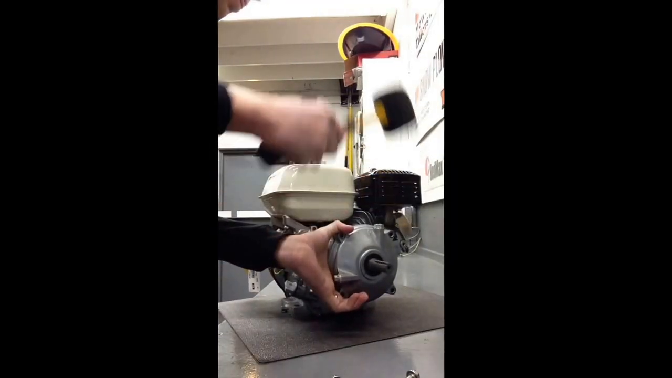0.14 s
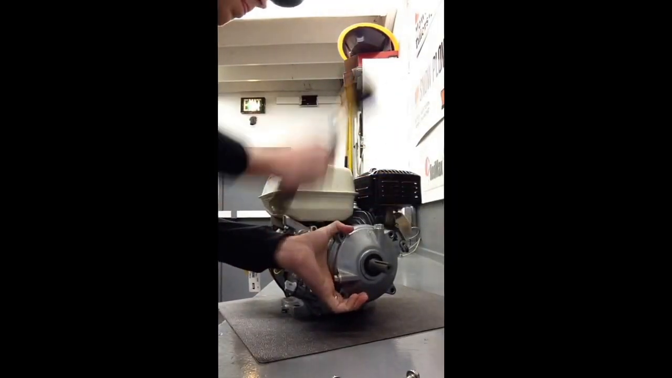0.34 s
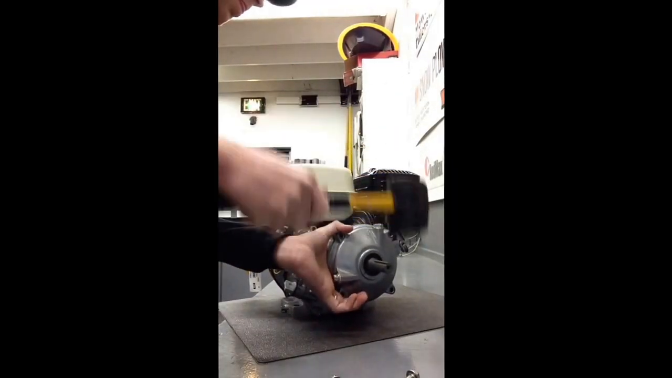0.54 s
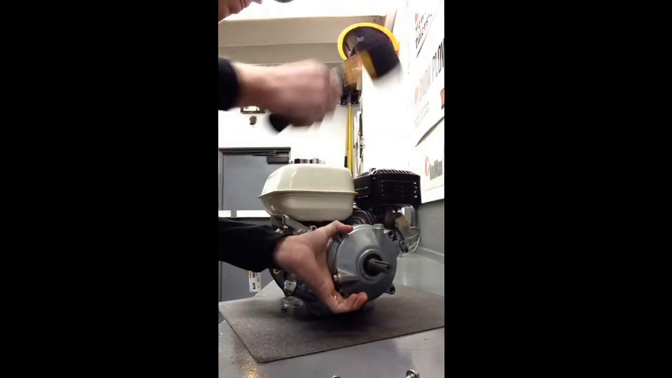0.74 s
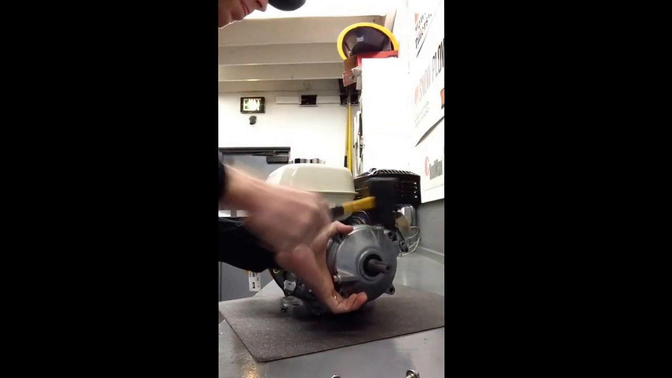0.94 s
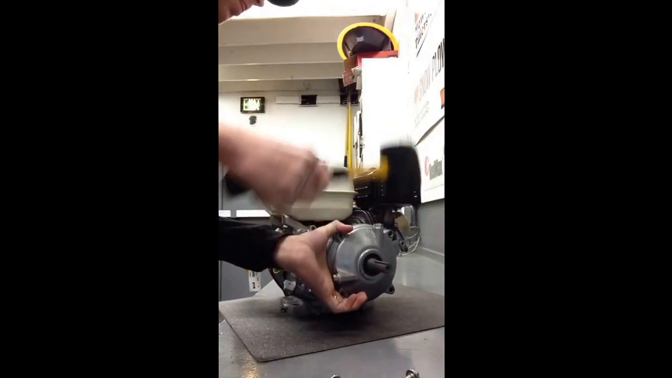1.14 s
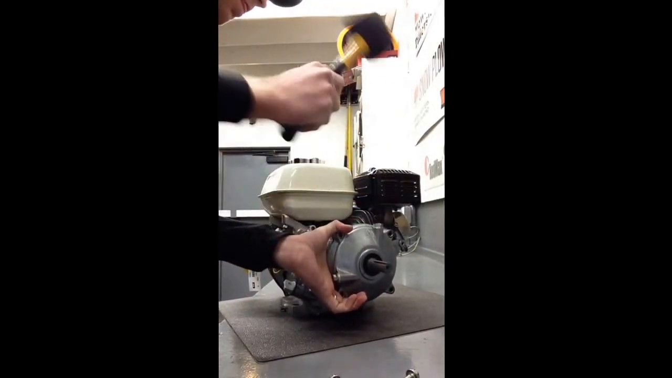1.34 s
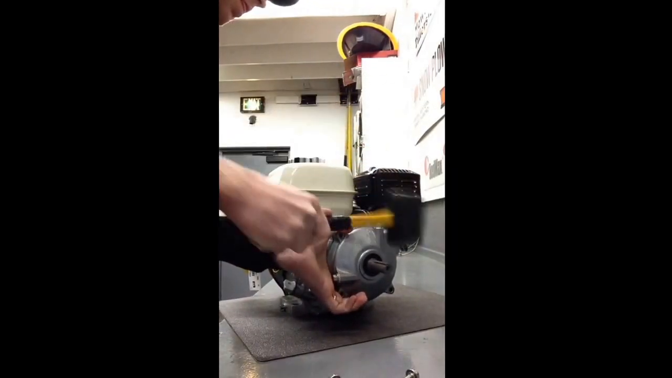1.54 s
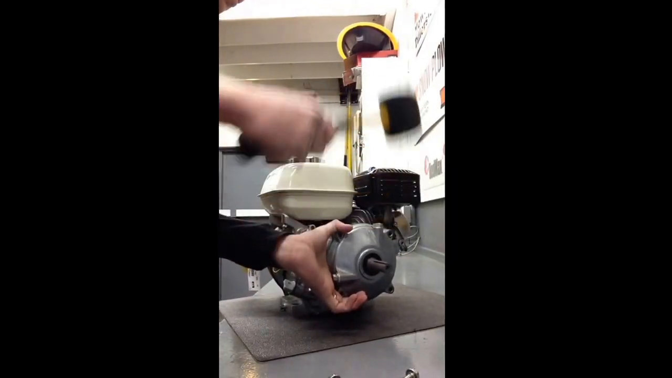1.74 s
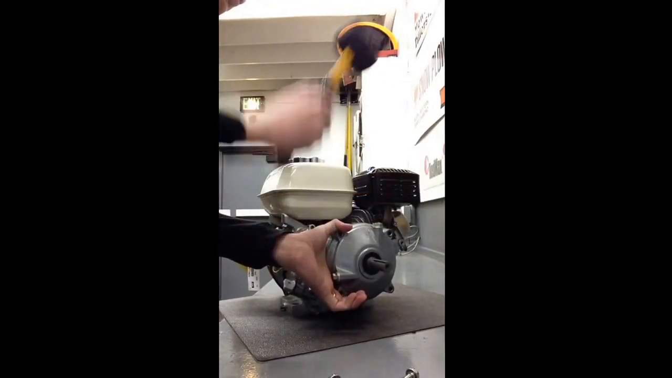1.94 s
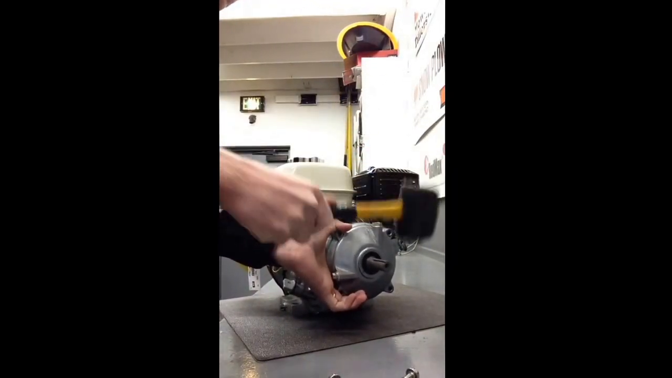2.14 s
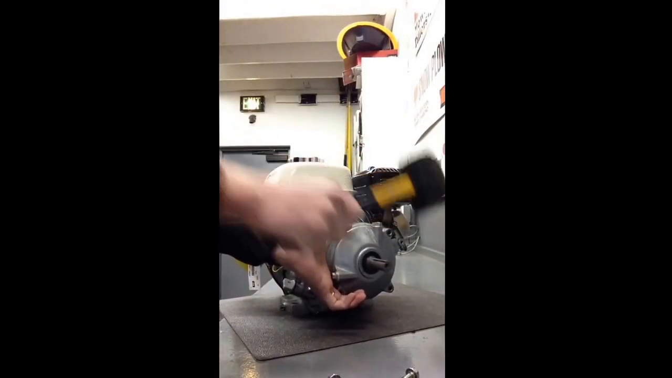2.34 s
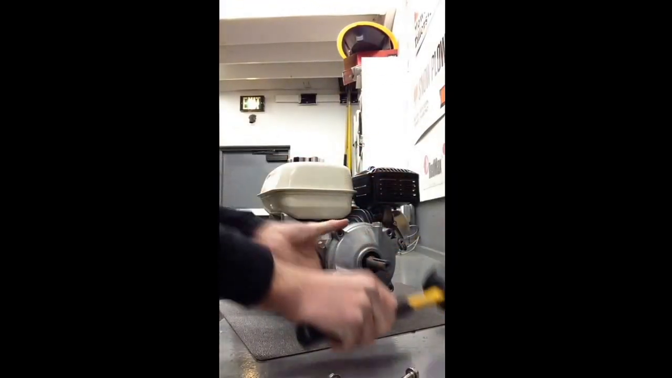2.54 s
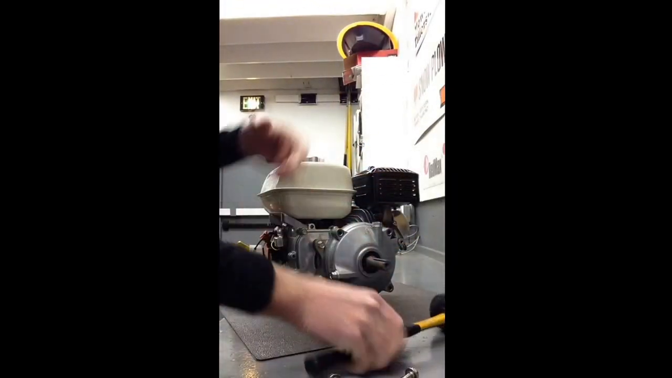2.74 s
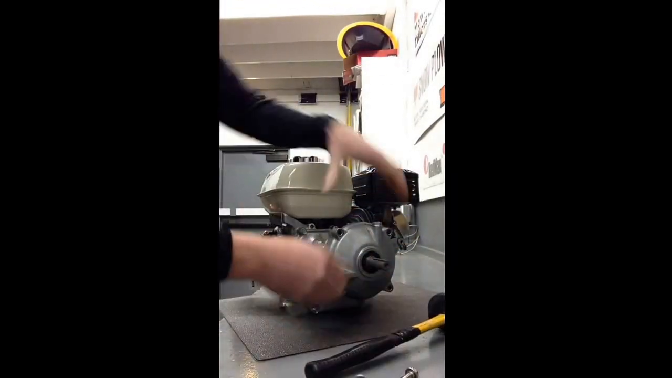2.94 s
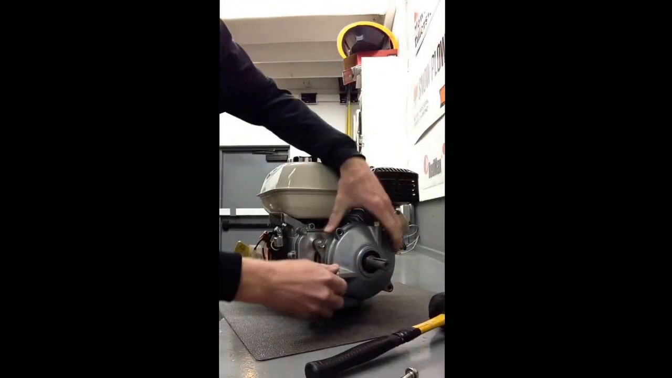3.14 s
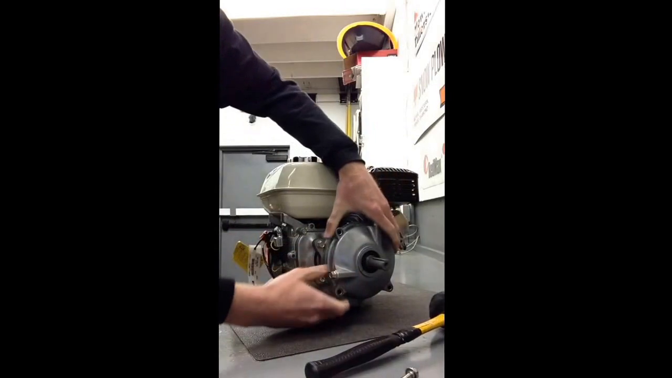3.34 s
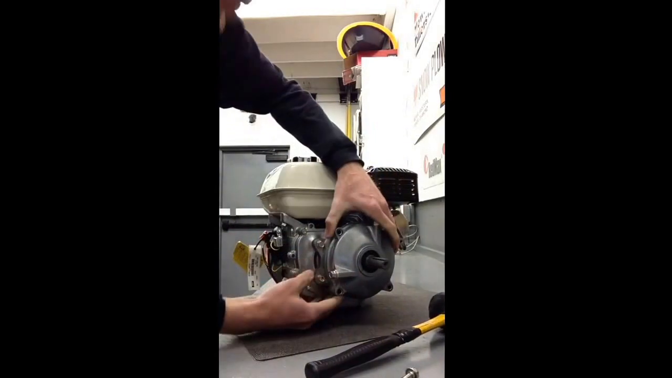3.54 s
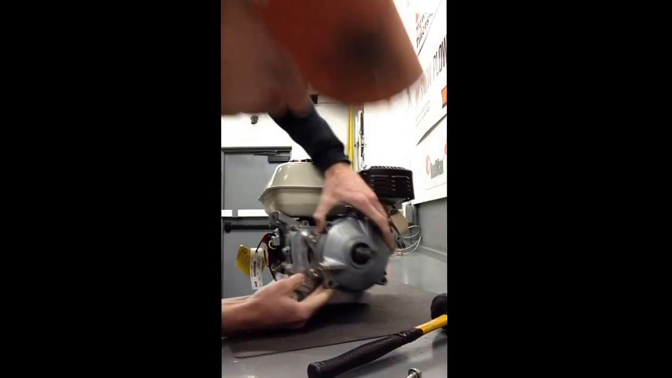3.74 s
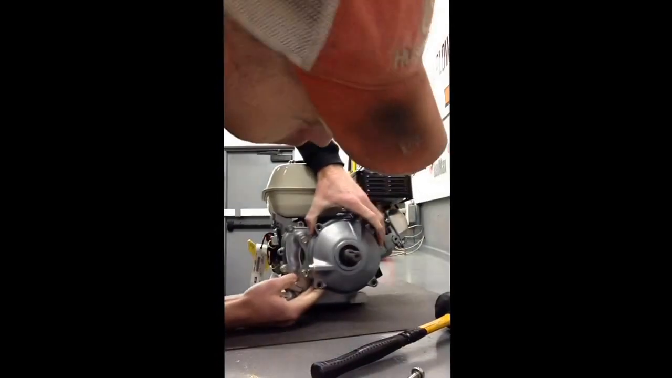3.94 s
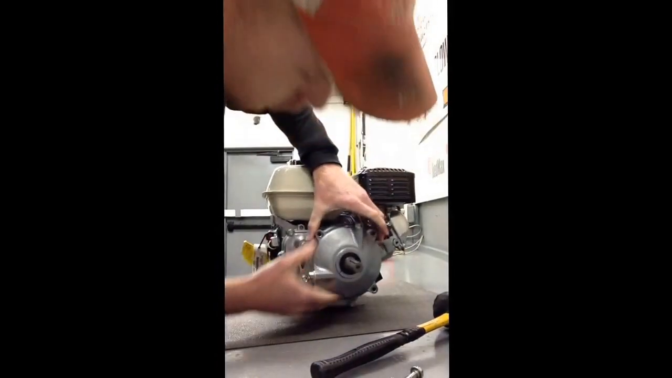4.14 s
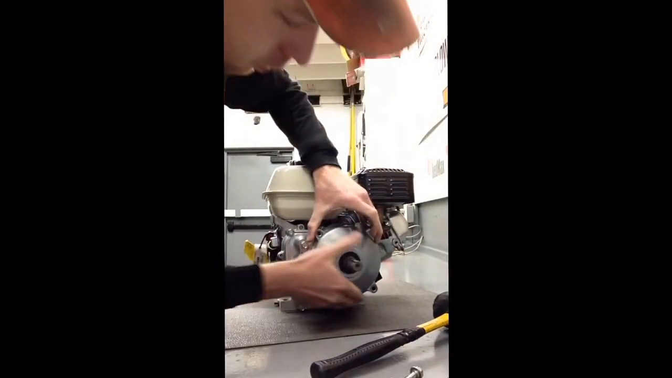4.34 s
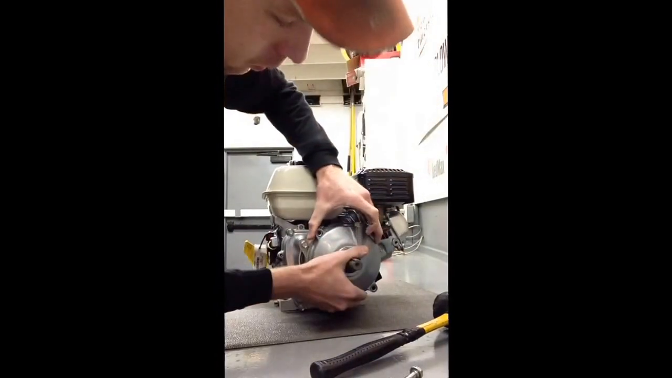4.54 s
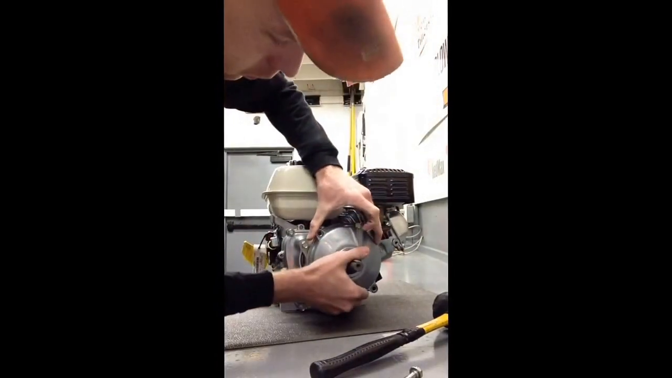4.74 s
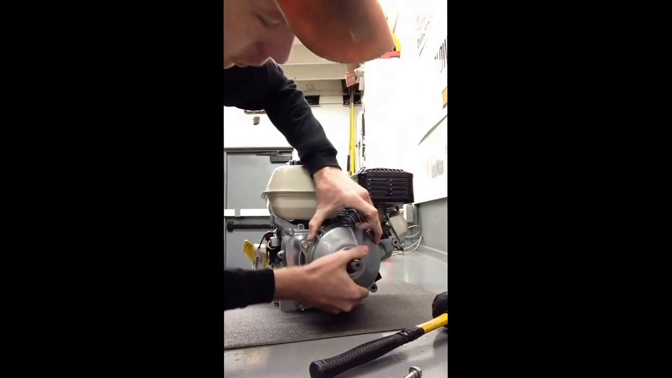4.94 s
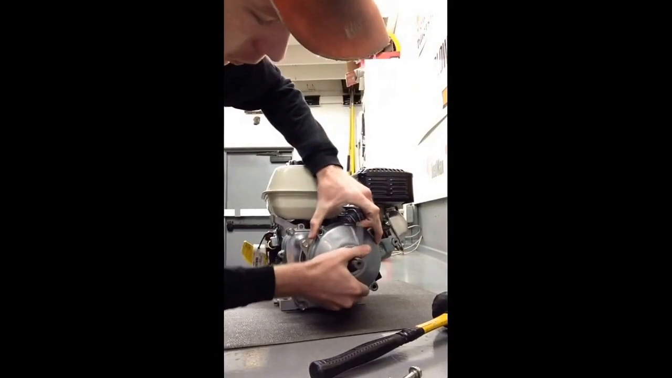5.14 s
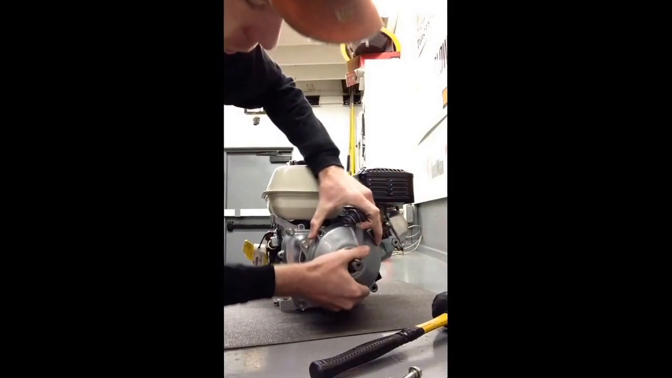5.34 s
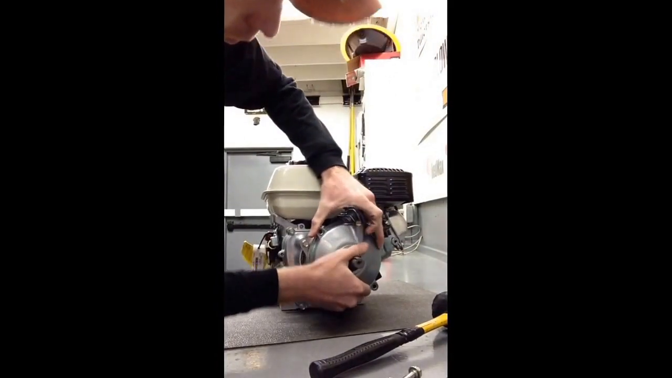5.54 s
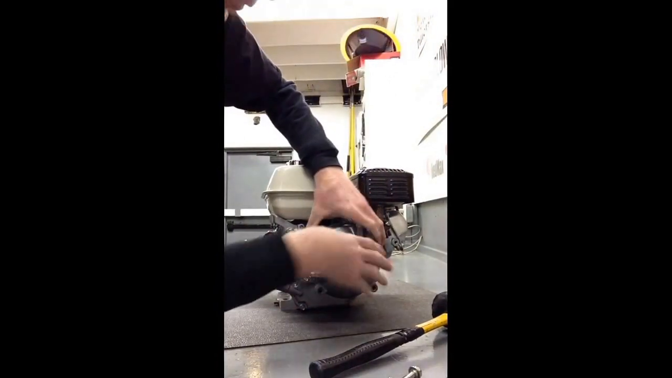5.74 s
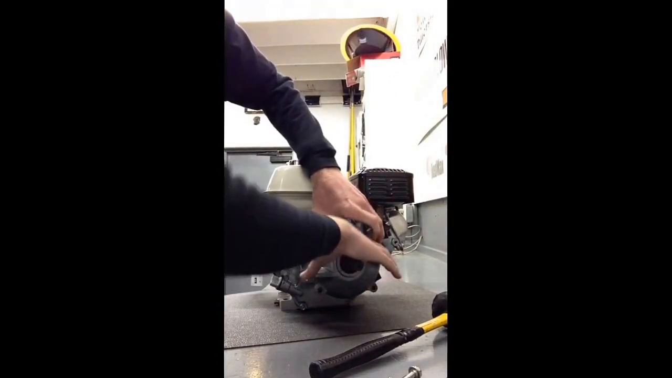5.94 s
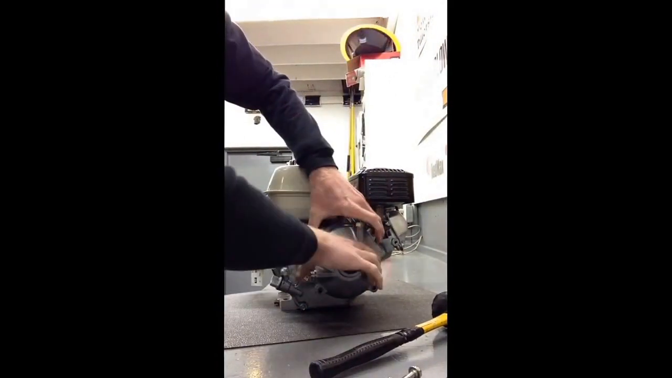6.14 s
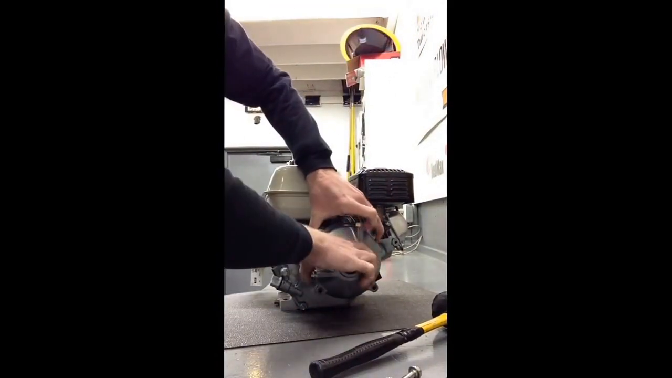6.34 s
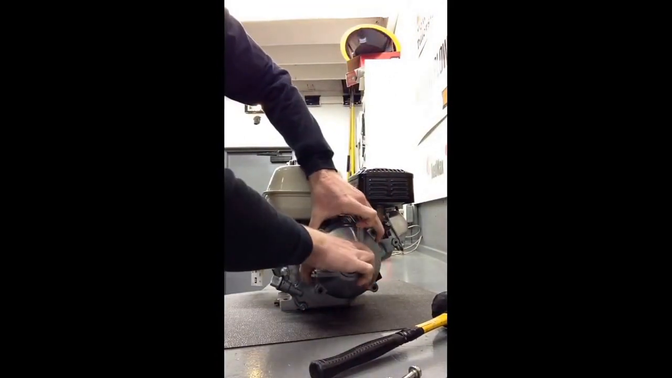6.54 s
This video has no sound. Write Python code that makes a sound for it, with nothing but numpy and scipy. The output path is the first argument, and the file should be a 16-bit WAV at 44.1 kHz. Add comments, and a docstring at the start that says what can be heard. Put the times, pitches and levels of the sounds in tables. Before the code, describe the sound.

Four hard rubber mallet blows ring a small engine's metal cover in a live workshop, then the mallet clatters down and the cover knocks loose.

```python
"""Quiet ventilation and hiss, made from filtered noise and wavering tones, run throughout.
A small engine on a workshop bench is still ringing from a blow before the start; four more rubber mallet
blows follow. Each adds bursts of noise, decaying tones for the cover and fins, and the room's echo.
Then the mallet is dropped on the bench: soft low thuds, with hard clacks of noise and handle tones.
Last, the side cover slides along its shaft: swishes of grainy noise, light knocks and low rocking thuds."""
import sys
import numpy as np
from scipy import signal
from scipy.fft import rfft, irfft, next_fast_len
from scipy.io import wavfile

SR = 44100
rng = np.random.default_rng(int(sys.argv[2]) if len(sys.argv) > 2 else 0)


def dump_mix(stems):
    """Bounce the given channels to the path in sys.argv[1] as a 16-bit WAV at rate SR."""
    frames = np.atleast_2d(stems).T  # one column per channel
    limited = np.clip(frames, -1, 1)  # hard clip at full scale
    pcm = np.round(limited * 32767).astype(np.int16)
    wavfile.write(sys.argv[1], SR, pcm)


N = 290178
RING_S = np.arange(SR) / SR  # one second of time, counted from the start of a sound


def amp(db):
    """Turn decibels into gain."""
    return 10 ** (np.asarray(db) / 20)


def at(points, hz):
    """Read a table of (frequency, value) points on a log-frequency axis."""
    f, value = np.transpose(points)
    return np.interp(np.log(np.maximum(hz, 1)), np.log(f), value)


def shape(x, db_of):
    """Filter by a gain in dB that depends on frequency; it never acts early, so attacks stay sharp."""
    size = next_fast_len(len(x) + SR // 10) * 2
    hz = np.maximum(np.fft.rfftfreq(size, 1 / SR), 20)
    # folding the cepstrum gives the filter minimum phase
    cepstrum = irfft(np.log(amp(db_of(hz))))
    cepstrum[1:size // 2] *= 2
    cepstrum[size // 2 + 1:] = 0
    response = np.exp(rfft(cepstrum))
    return irfft(rfft(x, size) * response)[:len(x)]


def colour(x, points):
    """Give white sound a spectrum while keeping its power."""
    hz = np.linspace(0, SR / 2, SR // 10)
    power = np.mean(amp(at(points, hz)) ** 2)
    return shape(x, lambda hz: at(points, hz)) / np.sqrt(power)


def tilt(x, db):
    """Brighten or dull a sound by dB per octave around 1500 Hz, levelling off below 250 Hz."""
    return shape(x, lambda hz: db * np.log2(np.maximum(hz, 250) / 1500))


def lift(x, centre_hz, db):
    """Raise or lower about one octave around a frequency."""
    return shape(x, lambda hz: db * np.exp(-2 * np.log2(hz / centre_hz) ** 2))


def ripple(x, spread_db, spacing_hz):
    """Overlapping damped resonances and near reflections leave random humps in a spectrum."""
    humps = rng.standard_normal(1024)

    def humps_db(hz):
        uneven = np.interp(hz / spacing_hz, np.arange(len(humps)), humps)
        return spread_db * uneven * np.minimum(hz / 2000, 1)  # weaker below 2000 Hz

    return shape(x, humps_db)


def fade(t60):
    """Die away exponentially, by 60 dB in t60 seconds."""
    return np.exp(-np.log(1000) * RING_S / t60)


def white():
    """One second of white noise."""
    return rng.standard_normal(len(RING_S))


def add(out, s, sound):
    """Mix a sound in at a time, which may lie before the start."""
    i = int(round(s * SR))
    part = sound[max(-i, 0):N - i]
    out[max(i, 0):max(i, 0) + len(part)] += part


def ring(modes):
    """Decaying sines; neighbours start in opposite directions, so close pairs swell and beat."""
    total = np.zeros(len(RING_S))
    for k, (hz, db, t60) in enumerate(modes):
        total += (-1) ** k * amp(db) * fade(t60) * np.sin(2 * np.pi * hz * RING_S)
    return total


# Spectrum of the ventilation and hiss: (frequency [Hz], relative level [dB])
AIR_SPECTRUM = [(25, -27), (60, -25), (110, -5), (155, -3.5), (210, 4.5), (280, -6), (500, -6.5),
                (850, -10), (1200, -14), (1900, -14), (2800, -19.5), (6000, -17.5), (9500, -12.5),
                (15000, -14)]
# Faint tones of the ventilation: (frequency [Hz], level [dB])
FAN_TONES = [(204, -69.5), (327, -74.5), (500.5, -72.5), (1787, -77), (2008, -80.5), (3058, -82)]


def background(air_db=-54, waver=0.0066, ripple_db=2.5):
    """Ventilation rumble and steady hiss are filtered noise; the fan tones waver in pitch."""
    out = amp(air_db) * ripple(colour(rng.standard_normal(N), AIR_SPECTRUM), ripple_db, 70)
    points = N * 10 // SR  # about ten random pitch points per second
    for hz, db in FAN_TONES:
        drift = np.interp(np.arange(N), np.linspace(0, N, points), rng.standard_normal(points))
        phase = 2 * np.pi * np.cumsum(hz * (1 + waver * drift)) / SR
        out += amp(db) * np.sqrt(2) * np.sin(phase)
    return out


# How long the workshop echoes: (frequency [Hz], time to fall 60 dB [s])
ROOM_DECAY = [(80, 0.434), (200, 0.44), (500, 0.39), (1100, 0.41), (2800, 0.47), (5000, 0.35), (8000, .3),
              (15000, 0.27)]


def workshop(build_cycles=1.5, count=12):
    """Dense reflections: each band builds up over a few cycles and dies at its own rate."""
    spectrum, hz = rfft(white()), np.fft.rfftfreq(len(RING_S), 1 / SR)
    centres = np.geomspace(ROOM_DECAY[0][0], ROOM_DECAY[-1][0], count)
    total = np.zeros(len(RING_S))
    for centre_hz, share in zip(centres, np.eye(count)):
        band = irfft(spectrum * at(np.c_[centres, share], hz))
        build_up = 1 - np.exp(-RING_S * centre_hz / build_cycles)
        total += band * fade(at(ROOM_DECAY, centre_hz)) * build_up
    return total


def stroke(s, length, speed_up_share=0.55, edge_db=-12):
    """A smooth swell: the hand gains speed, then stops a little faster."""
    t = np.arange(N) / SR - s
    side_s = length * np.where(t < 0, speed_up_share, 1 - speed_up_share)
    return amp(edge_db * (t / side_s) ** 2)


# Spectrum of the swish: (frequency [Hz], relative level [dB])
SWISH_SPECTRUM = [(200, -25), (550, 1), (900, 1), (1400, -7.5), (2800, 0), (5000, -1), (9000, -1),
                  (15000, -1.5)]
# One quick pull of the cover along its shaft, then two slow easing moves:
# (time of top speed [s], level [dB], length [s])
SLIDE_STROKES = [(3.765, -44.5, 0.22), (4.28, -64, .75), (5.17, -67.5, .75)]


def slide(grain_db=3):
    """Fine friction grains swell and fade as the cover is drawn outwards."""
    grains = rng.standard_normal(N) * amp(grain_db * rng.standard_normal(N))
    swell = sum(amp(db) * stroke(s, length) for s, db, length in SLIDE_STROKES)
    return colour(grains / grains.std(), SWISH_SPECTRUM) * swell


def thud(modes, push_cycles=0.45):
    """Soft contacts push slowly and give a few heavily damped cycles."""
    total = np.zeros(len(RING_S))
    for hz, db, t60 in modes:
        push = (1 - np.exp(-RING_S * hz / push_cycles)) ** 2
        total -= amp(db) * np.sin(2 * np.pi * hz * RING_S) * fade(t60) * push
    return total


# The rubber head lands on the bench and bounces twice: (time [s], level [dB])
HEAD_BOUNCES = [(2.5755, -2.2), (2.6881, -11.5), (2.7645, -14)]
# Modes (natural tones) of the bench top under the head:
# (frequency [Hz], relative level [dB], time to fall 60 dB [s])
BENCH_MODES = [(209, 0.5, 0.028), (356, -18, .085), (136, -23, 0.19), (240, -21, .11)]
# The engine rocks on its mat as the cover is pulled: (time [s], level [dB])
ENGINE_ROCKS = [(3.741, -45), (3.836, -40.5), (4.093, -52), (4.781, -41.5)]


def thuds(room, room_db=-40, rock_hz=104.5, rock_t60=.14):
    """The mallet head bounces on the bench; later the engine rocks on it, lower and softer."""
    out = np.zeros(N)
    bounce = thud(BENCH_MODES)
    rock = thud([(rock_hz, 0, rock_t60)])
    for events, sound in (HEAD_BOUNCES, bounce), (ENGINE_ROCKS, rock):
        for s, db in events:
            add(out, s, amp(db) * sound)
    echo = signal.fftconvolve(out, room)[:N]
    return out + amp(room_db) * echo


# Dry clacks of the mallet settling on the bench:
# (time [s], level [dB], treble tilt [dB per octave], contact time to fall 60 dB [s])
BENCH_CLACKS = [(2.577, -47, -3.5, 0.17), (2.689, -50, -6, 0.05), (2.7538, -17.5, -1, 0.0083),
                (2.7948, -25.5, -1, 0.02)]
# Spectrum of a clack: (frequency [Hz], relative level [dB])
CLACK_SPECTRUM = [(100, -23), (420, -5), (650, -1.5), (950, -3), (1480, 1), (1900, -1.5), (2700, -5),
                  (3600, -9), (6000, -22.5), (15000, -38)]
# Modes of the handle on the bench top:
# (frequency [Hz], relative level [dB], time to fall 60 dB [s])
HANDLE_MODES = [(650, -10.5, 0.23), (1394, -6, 0.19), (1480, -9, 0.11), (1920, -13, 0.25),
                (2220, -18, 0.32), (2660, -14, 0.18), (3270, -12, 0.092)]


def clacks(room_db=-19, ring_db=-11, rise_s=.0006, chatter_db=-19, chatter_t60=.13, chatter_spread_db=5):
    """Hard, short contacts; the handle chatters on and rings briefly, with the room behind it."""
    out, handle = np.zeros(N), amp(ring_db) * ring(HANDLE_MODES)
    for s, db, tilt_db, t60 in BENCH_CLACKS:
        hit = 2 * fade(t60) * (1 - np.exp(-RING_S / rise_s))
        # chatter: the force steps to a new random strength 300 times a second
        touches = np.repeat(amp(chatter_spread_db * rng.standard_normal(300)), SR // 300)
        chatter = amp(chatter_db) * touches * fade(chatter_t60)
        contact = colour(white() * (hit + chatter) + amp(room_db) * workshop(), CLACK_SPECTRUM)
        add(out, s, amp(db) * tilt(contact + handle, tilt_db))
    return out


# Modes of the cover: (frequency [Hz], relative level [dB], time to fall 60 dB [s])
COVER_MODES = [(388, -20, 0.72), (448, -8, 0.43), (476, -9.5, 0.36), (554, -13.5, 0.38),
               (586.6, -4.5, 0.39), (750, -7, 0.35), (804, -10.5, 0.3), (826, -12.5, 0.37), (853, 5.5, .38),
               (873.6, 4, 0.36), (875, -3, 0.8), (889.3, 5.5, 0.38), (974, -2.5, 0.43), (1148, -10, 0.31),
               (1180, -12, 0.26), (1350, -14.5, .32), (1350, -8, 0.33), (1817, -11.5, 0.31),
               (1894, -27, 0.91), (2023, -11.5, .28), (2247, -26, .32), (2590, -15.5, 0.3),
               (2700, -13.5, 0.24), (2690, -17, .3), (2790, -15.5, .25), (2845, -18, .3),
               (3729, -21.5, 0.27), (4300, -23, 0.28), (5420, -15.5, 0.28), (8760, -25, .2)]


def cover_ring():
    """The cast cover rings at its own set of decaying tones."""
    return ring(COVER_MODES)


# Spectrum of the engine's crowd of small modes: (frequency [Hz], relative level [dB])
CLANG_SPECTRUM = [(30, -17.5), (65, -18), (110, -4), (220, 0.5), (340, -5.5), (520, -0.5), (700, -0.5),
                  (1000, 1), (1600, -6.5), (2700, -8.5), (3600, -11.5), (5600, -16), (9000, -20.5),
                  (15000, -27)]


def engine_clang(noise):
    """The engine's many small modes, too crowded to tell apart, colour the noise."""
    return colour(noise, CLANG_SPECTRUM)


# The cover knocks and scuffs on its shaft and dowels:
# (time [s], level [dB], centre of the excited band [Hz], band width [octaves])
COVER_KNOCKS = [(3.145, -28.5, 2450, 0.65), (3.766, -30, 900, 1.6), (4.121, -37.5, 2400, 0.8),
                (4.235, -41, 1800, 1), (4.772, -20, 760, 1.7), (4.966, -25, 700, 0.85),
                (5.203, -31.5, 1100, 0.4), (5.366, -33.5, 800, 0.55), (6.413, -37, 680, 0.39)]


def knocks(cover, ring_db=-23, held_t60=0.28, scrape_db=-11, scrape_t60=0.073, room_db=-22.5, bite_s=.003):
    """The loose cover grates briefly on its shaft; the hands damp its ring."""
    out = np.zeros(N)
    held_ring = amp(ring_db) * cover * fade(held_t60)
    bite = 1 - np.exp(-RING_S / bite_s)  # a slightly soft start
    for s, db, centre_hz, octaves in COVER_KNOCKS:
        scrape = amp(scrape_db) * white() * fade(scrape_t60)
        grate = engine_clang(scrape + amp(room_db) * workshop())
        knock = (grate + held_ring) * bite

        def band_db(hz):
            return -15 * np.log10(1 + (np.log2(hz / centre_hz) / octaves) ** 2)

        add(out, s, amp(db) * shape(knock, band_db))
    return out


# The many high modes of the cooling fins and shrouds: (frequency [Hz], relative level [dB])
FIN_SPECTRUM = [(1200, -6), (1600, -2.5), (2600, 6), (3300, -10.5), (4300, -13.5), (5600, -7.5),
                (6800, -11.5), (8600, -3.5), (11000, -7.5), (15000, -11.5)]


def fins(count=260, spread_db=3, t60=.3):
    """A crowd of thin metal modes, unevenly strong; the higher ones tend to die sooner."""
    place, strength, life = rng.random((count, 3)).T
    low_hz, high_hz = FIN_SPECTRUM[0][0], FIN_SPECTRUM[-1][0]
    hz = low_hz + (np.arange(count) + place) / count * (high_hz - low_hz)
    gains = amp(at(FIN_SPECTRUM, hz) + spread_db * np.sqrt(12) * (strength - .5))
    t60s = t60 * (0.93 + life / 2) * (hz / 3000) ** -.3
    t = RING_S[:SR // 2].astype(np.float32)  # half a second is computed
    # each pole holds a decay rate (real part) and a pitch (imaginary part)
    poles = (2j * np.pi * hz - np.log(1000) / t60s).astype(np.complex64)
    turns = 2 * np.pi * rng.random(count)
    crowd = np.zeros(len(t))
    for gain, pole, turn in zip(gains, poles, turns):
        crowd += gain * np.exp(pole.real * t) * np.sin(pole.imag * t + np.float32(turn))
    return np.pad(crowd, (0, len(RING_S) - len(t))) / np.sqrt(np.sum(gains ** 2))


# Standing waves of the workshop: (frequency [Hz], relative level [dB], time to fall 60 dB [s])
STANDING_WAVES = [(79, -7.5, 0.24), (96.5, -2, 0.35), (136.2, -.5, .36), (173.3, 1, 0.42)]


def room_boom(rise_s=0.0083):
    """A blow sets the room's low standing waves booming; they need a moment to build up."""
    return ring(STANDING_WAVES) * (1 - np.exp(-RING_S / rise_s))


# Mallet blows; the first is only still ringing:
# (time [s], level [dB], cover ring [dB], treble tilt [dB per octave],
#  band favoured by the struck spot [Hz], its lift [dB])
MALLET_BLOWS = [(-.19, 0.5, -4.5, -0.5, 2505, 2), (0.3761, 0, 0.5, -0.3, 1123, 1),
                (0.9164, 1.5, -6.5, -0.4, 600, -2.5), (1.464, 1.52, -4, -0.64, 8500, 5),
                (2.0176, 2.1, -3.5, -0.05, 950, 2.5)]
# Spectrum of the crack of contact: (frequency [Hz], relative level [dB])
CRACK_SPECTRUM = [(30, -19), (120, -5.5), (350, 0), (700, 4.5), (1400, -3.5), (2700, -4), (5000, -9),
                  (9000, -16.5), (15000, -17.5)]


def mallet(room, cover, ring_db=-18.5, clang_db=-16, fins_db=-21, crack_db=-13, snap_db=-5, boom_db=-28,
           crack_t60=0.039, snap_t60=0.0074, own_share=0.44):
    """Each blow snaps the cover against the block, rings it and the fins, and sets the room booming."""
    out, shimmer, boom = np.zeros(N), amp(fins_db) * fins(), amp(boom_db) * room_boom()
    force = amp(crack_db) * fade(crack_t60) + amp(snap_db) * fade(snap_t60)
    for s, db, cover_db, tilt_db, spot_hz, spot_db in MALLET_BLOWS:
        # the mallet lands on a slightly different spot each time, so part of the clang changes
        mixed = np.sqrt(1 - own_share) * room + np.sqrt(own_share) * workshop()
        clang = amp(clang_db) * engine_clang(mixed)
        crack = colour(white() * force, CRACK_SPECTRUM)
        metal = ripple(clang + crack + shimmer, 2.8, 110)
        # the spot also sets how strongly the cover's main bending modes answer, and favours one band
        rung = amp(ring_db) * lift(cover, 990, cover_db)
        blow = tilt(metal + boom + rung, tilt_db)
        add(out, s, amp(db) * lift(blow, spot_hz, spot_db))
    return out


def scene():
    """All sources together; the thuds and the mallet blows share one room echo, and the knocks and blows share
    the cover's ring."""
    room, cover = workshop(), cover_ring()
    quiet = background() + slide()
    contacts = thuds(room) + clacks() + knocks(cover)
    return (quiet + contacts + mallet(room, cover))[None]


def record(dry, low_cut_hz=66, top_hz=15280):
    """The small microphone sheds the deep bass; the recorder rounds the loudest peaks and cuts the top."""
    thin = signal.sosfilt(signal.butter(3, low_cut_hz, "high", fs=SR, output="sos"), dry)
    rounded = .8 * np.tanh(thin / .8)
    return signal.sosfilt(signal.ellip(10, .2, 80, top_hz, fs=SR, output="sos"), rounded)


dry = scene()
out = record(dry)
dump_mix(out)
```